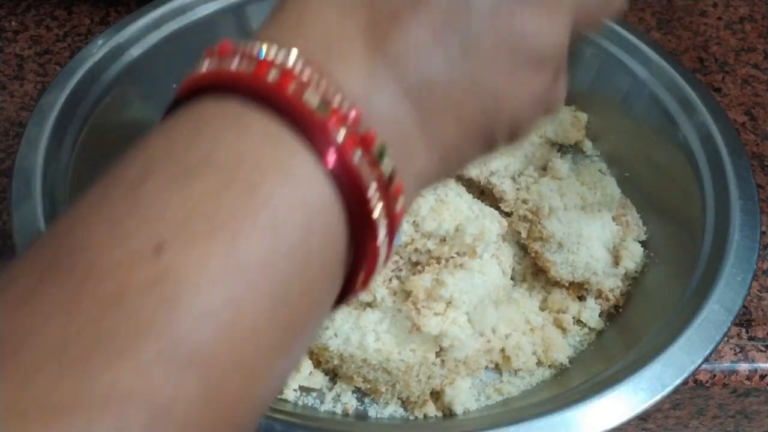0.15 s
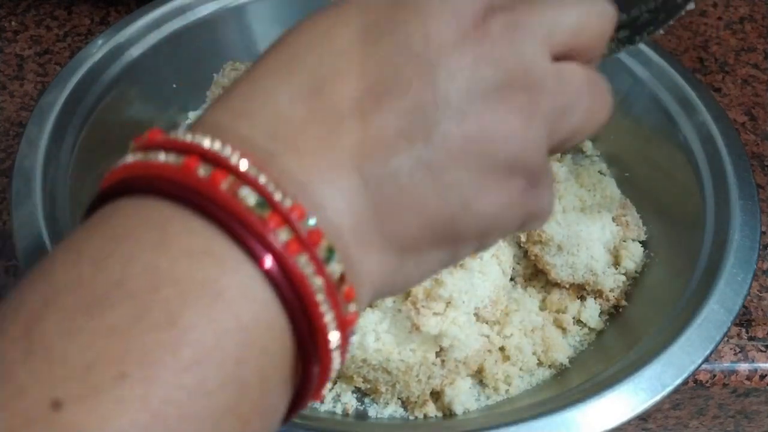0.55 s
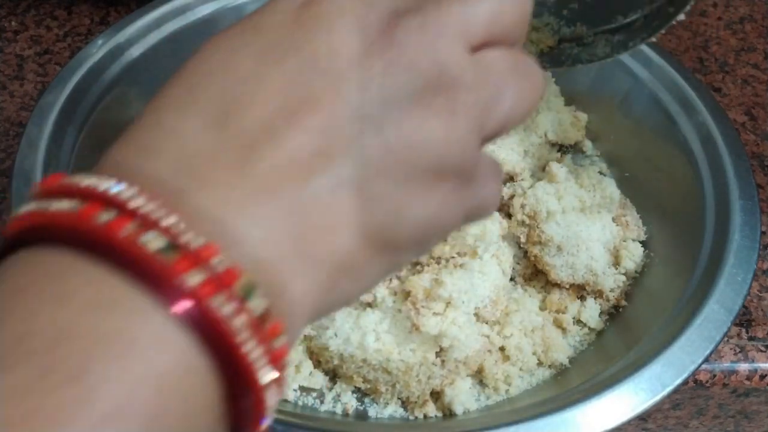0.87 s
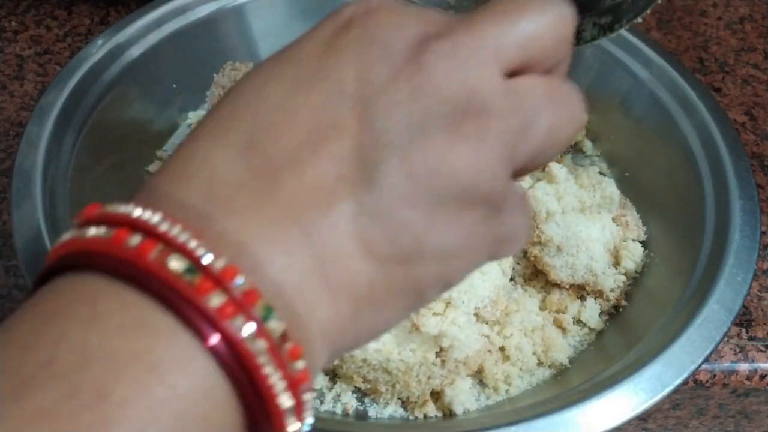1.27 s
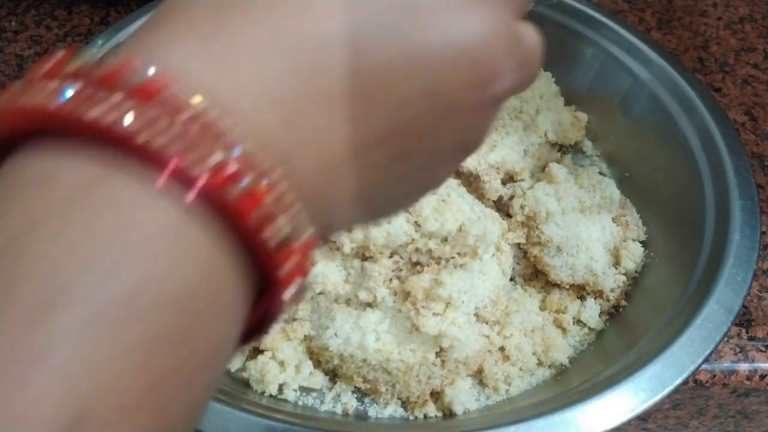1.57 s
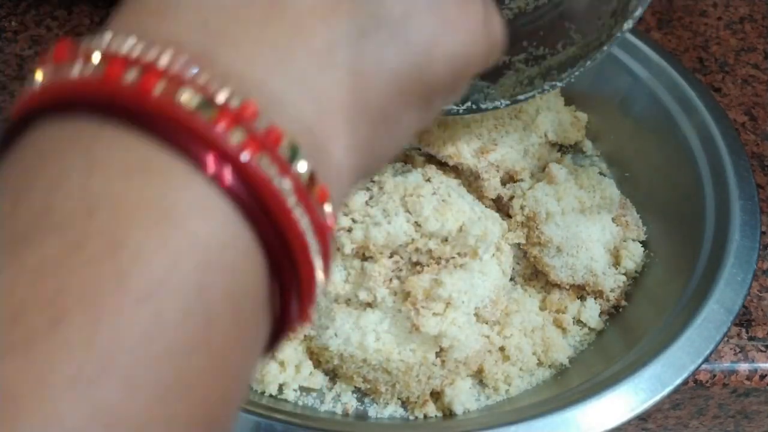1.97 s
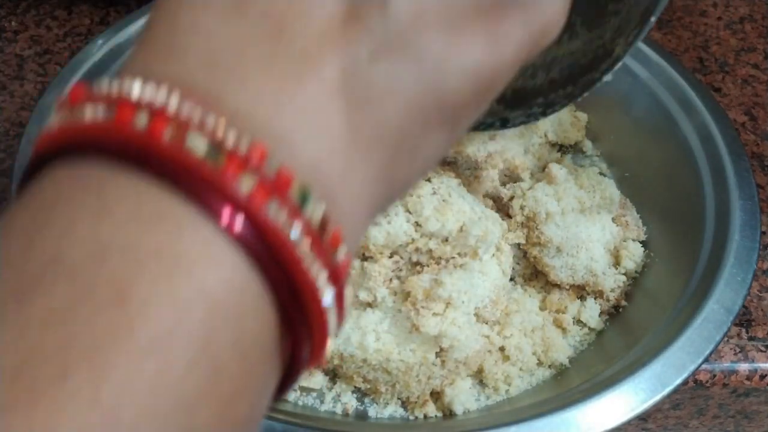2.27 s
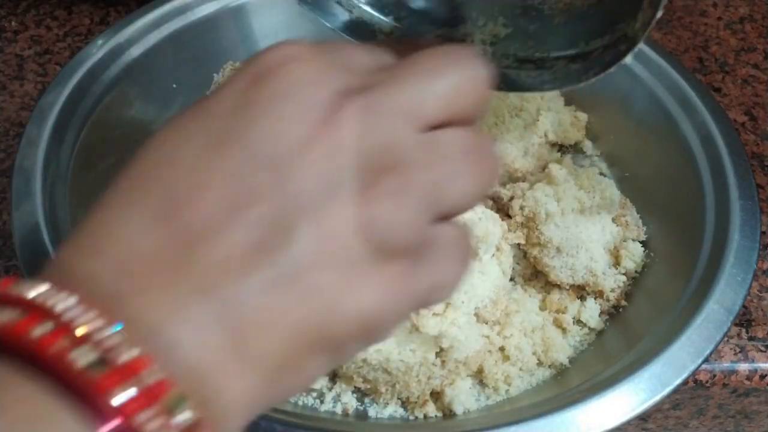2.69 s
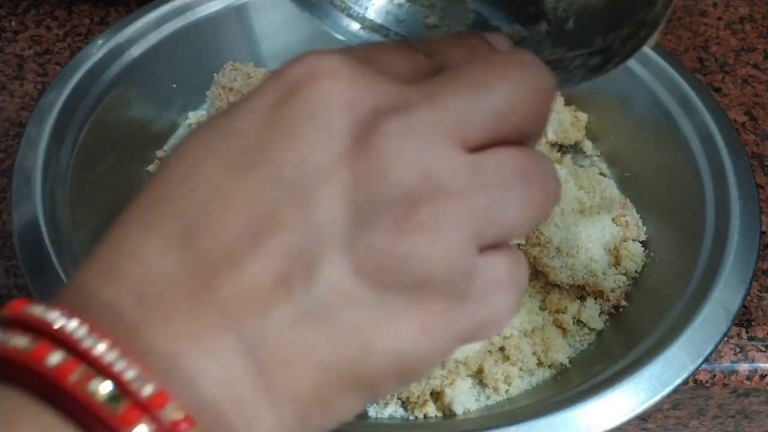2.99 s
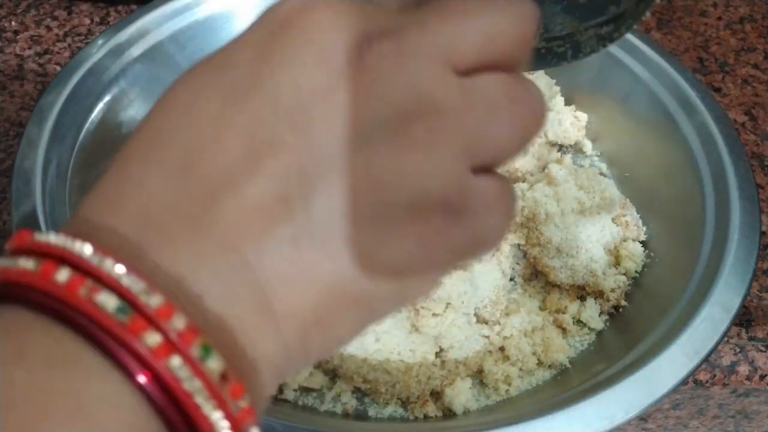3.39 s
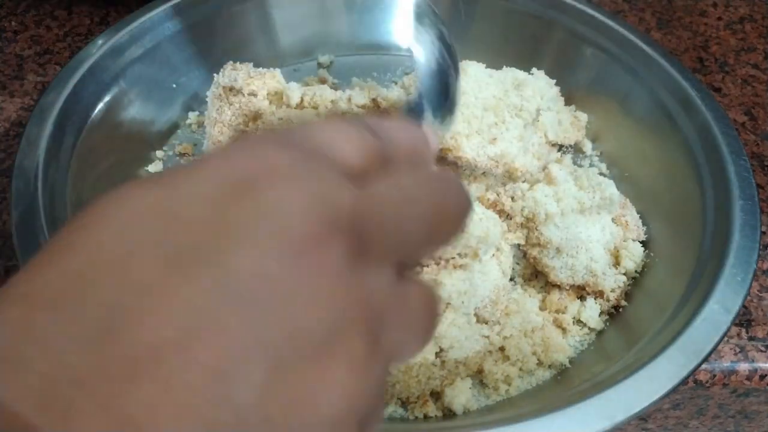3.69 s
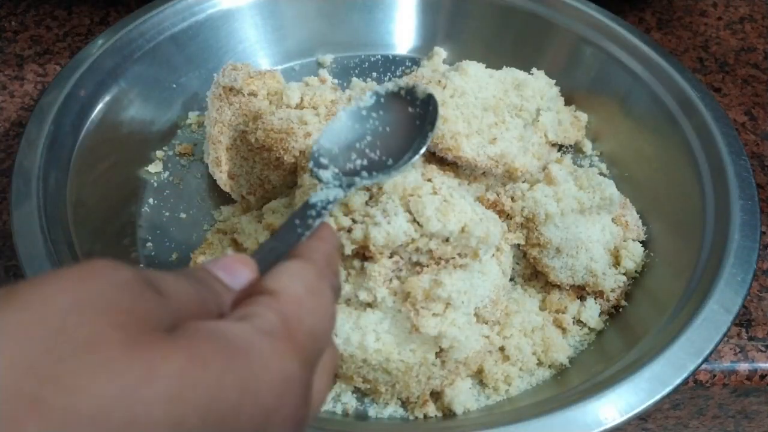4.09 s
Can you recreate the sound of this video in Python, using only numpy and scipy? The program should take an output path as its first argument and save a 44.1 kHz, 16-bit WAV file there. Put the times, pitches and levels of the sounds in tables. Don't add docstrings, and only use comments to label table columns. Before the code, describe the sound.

A metal spoon knocks and scrapes quickly inside a small hollow steel tin, then taps the rim of a full steel bowl in a kitchen.

```python
import sys
import numpy as np
from scipy import signal
from scipy.fft import rfft, irfft
from scipy.io import wavfile
from scipy.ndimage import uniform_filter1d

SR = 44100
rng = np.random.default_rng(int(sys.argv[2]) if len(sys.argv) > 2 else 0)


def int16_out(signal):
    q = np.round(np.clip(np.atleast_2d(signal).T, -1, 1) * 32767)
    wavfile.write(sys.argv[1], SR, q.astype(np.int16))


def gain_from_db(level_db):
    decades = np.asarray(level_db, float) / 20
    return 10 ** decades


N = 187072


def rms_one(x):
    return x / np.sqrt(np.mean(x ** 2) + 1e-20)


def at_hz(points, hz):
    curve_hz, values = np.transpose(points)
    return np.interp(np.log(hz), np.log(curve_hz), values)


def ring(drive, hz, t60):
    r, w = gain_from_db(-60 / (t60 * SR)), 2 * np.pi * hz / SR
    return signal.lfilter([0, np.sin(w)], [1, -2 * r * np.cos(w), r * r], drive + 1e-18)


def colour(x, spectrum):
    hz = np.maximum(np.fft.rfftfreq(4096, 1 / SR), 5)
    cepstrum = irfft(np.log(gain_from_db(np.maximum(at_hz(spectrum, hz), -70))))
    cepstrum[1:2048] *= 2
    cepstrum[2049:] = 0
    response = irfft(np.exp(rfft(cepstrum)))[None, :2048]
    return signal.fftconvolve(x, response / np.sqrt(np.sum(response ** 2)), axes=1)[:, :N]


def contacts(s, db, ms, ring_db, ring_ms, alike):
    t_ms = np.arange(5000) / SR * 1000
    chatter = np.exp(-t_ms / np.clip(ms, .3, 30)[:, None])
    hiss = gain_from_db(ring_db) * np.exp(-t_ms / ring_ms)
    onset = 1 - np.exp(-t_ms / .5)
    shape = (chatter + hiss) * onset * gain_from_db(db)[:, None]
    both, own = np.moveaxis(rng.standard_normal((len(s), 2, 5000)), 1, 0) * shape
    bursts = both + np.sqrt(1 - np.clip(alike, 0, 1)) * own * [[[1]], [[-1]]]
    return np.round(s * SR).astype(int), bursts


def placed(starts, bursts):
    out = np.zeros((2, N + 5000))
    for k, start in enumerate(starts):
        out[:, start:start + 5000] += bursts[:, k]
    return out[:, :N]


def stroke(dull, below_db):
    # start/s, end/s, pressure at start/dB, pressure at end/dB, dullness/dB
    strokes = [(0.012, 0.067, -52, -49, -9), (0.085, 0.231, -40, -44.5, -10),
               (0.231, 0.309, -43.5, -37, -11), (0.302, 0.42, -34.5, -57.5, -9.5),
               (0.593, 0.691, -50.5, -41.5, -12), (0.7, 0.757, -37, -65, -13.5),
               (0.953, 1.055, -47.5, -40.5, -15), (1.269, 1.36, -44, -40.5, -15),
               (1.62, 1.831, -38.5, -34.5, -16), (1.833, 2.055, -35, -35.5, -15.5),
               (2.239, 2.31, -44, -33.5, -14.5), (2.307, 2.38, -32.5, -46.5, -17.5),
               (2.381, 2.424, -44, -35.5, -16.5), (2.6, 2.729, -53, -42, -17), (3.04, 3.09, -54, -34, -17),
               (3.381, 3.43, -58, -37.5, -8), (3.446, 3.506, -50, -36, -18)]
    t, gain = np.arange(N) / SR, np.zeros(N)
    for start, end, first_db, last_db, dull_db in strokes:
        pressure_db = np.interp(t, [start, end], [first_db, last_db])
        touching = (t >= start) * (t < end)
        gain += gain_from_db(pressure_db + dull * dull_db + below_db) * touching
    return uniform_filter1d(gain, size=500)


def grit(per_s, spread_db, slip_db):
    sizes = gain_from_db(spread_db * np.minimum(rng.exponential(1, N), 5)) * rng.choice([-1, 1], N)
    slow_noise = uniform_filter1d(uniform_filter1d(rng.standard_normal(N), size=250), size=150)
    catches = rng.random(N) < per_s / SR
    return rms_one(sizes * gain_from_db(slip_db * rms_one(slow_noise)) * catches)


def scattered(x, t60, turns_per_s):
    t, out = np.arange(2000) / SR, 0
    for k in range(4):
        here = np.maximum(np.cos(2 * np.pi * (turns_per_s * np.arange(N) / SR + k / 4)), 0)
        modes = rng.standard_normal((2, 2000)) * gain_from_db(-60 * t / t60)
        modes = modes / np.sqrt((modes ** 2).sum(axis=1, keepdims=True))
        out = out + signal.fftconvolve((x * here)[None], modes, axes=1)[:, :N]
    return out


def background():
    # f/Hz, density/dB per Hz
    air_colour = [(12, -48), (20, -14.5), (208, -12.5), (284, -7), (662, -10), (721, -7), (784, -10.5),
                  (878, -11), (1200, -12.5), (4150, -23.5), (4770, -28.5), (11100, -24), (17000, -52)]
    # f/Hz, likeness/1
    air_likeness = [(60, 0.09), (240, 0.95), (950, 0.91), (3770, -0.55), (15000, -0.04)]
    # f/Hz, level/dB rms
    motor_lines = [(276.9, -65), (71.8, -79), (306, -95)]
    hz = np.maximum(np.fft.rfftfreq(N, 1 / SR), 5)
    mid, side = rfft(rng.standard_normal((2, N)))
    alike = np.clip(at_hz(air_likeness, hz), 0, 1)
    pair = np.sqrt(1 + alike) * mid + np.sqrt(1 - alike) * side * [[1], [-1]]
    air = gain_from_db(-58) * rms_one(irfft(pair * gain_from_db(at_hz(air_colour, hz)), N))
    motor = sum(gain_from_db(db) * rms_one(ring(rng.standard_normal(N), line_hz, 0.55)) for line_hz, db in motor_lines)
    return air + motor


def tin():
    # t/s, bright level/dB, body level/dB, body pitch where it lands/Hz
    knocks = [(0.0064, -26.5, -71, 770), (0.0817, -24.5, -32.5, 893), (0.2394, -38, -44.5, 870),
              (0.3067, -39, -50, 855), (0.3436, -59, -40.5, 990), (0.384, -38.5, -46, 890),
              (0.481, -41.5, -41.5, 730), (0.5092, -38.5, -39.5, 1390), (0.5346, -22.5, -32, 900),
              (0.6158, -36, -37, 1510), (0.7164, -34, -71, 1730), (0.9432, -25.5, -36, 1850),
              (1.0623, -22, -38.5, 1900), (1.2469, -20, -41, 1510), (1.3505, -13, -71, 2340),
              (1.5796, -17, -19.5, 773), (1.8244, -32.5, -32, 800), (2.157, -29.5, -34.5, 763),
              (2.2212, -24, -30.5, 757), (2.5485, -26, -33, 1540), (2.611, -26, -38, 1640),
              (2.7332, -13.5, -75, 1810), (3.0042, -19, -36.5, 2480), (3.097, -16, -59, 2080),
              (3.367, -30, -36, 750), (3.429, -38, -49.5, 1560), (3.518, -14, -73, 2270),
              (3.7717, -44.5, -62, 1660), (3.7844, -46, -58, 734), (3.8145, -50, -55.5, 1120),
              (0.618, -42, -38, 1600),
        (0.535, -29.5, -32.5, 1890),
        (1.5833, -24, -23, 2650),
        (1.584, -37, -32, 1010),
        (2.223, -28, -30.5, 1494),
        (2.612, -27.5, -36.5, 1890),
        (3.103, -26, -50, 3050),
    ]
    # f/Hz, density/dB per Hz
    wall_colour = [(1650, -15), (2800, -8.5), (3090, -14), (4080, -20), (4680, -11), (5540, -18),
                   (6070, -15), (6660, -11), (8710, 0.5), (10200, -1), (14000, -25.5), (16000, -27),
                   (17500, -46)]
    # f/Hz, density/dB per Hz
    body_colour = [(120, -24), (300, -12.5), (480, -3.5), (640, -14.5), (790, -6), (1000, -4), (1250, -14),
                   (1500, -5.5), (2000, -9), (2600, -11), (3300, -24.5), (4000, -27)]
    # f/Hz, density/dB per Hz
    rubbed_wall_colour = [(1880, -36), (3200, -20), (3780, -18), (6130, -20), (8280, -4), (9860, 0.5),
                          (10600, -2.5), (12200, -13), (15500, -25.5), (16600, -25), (17000, -35)]
    # f/Hz, density/dB per Hz
    rubbed_body_colour = [(290, -40.5), (500, -4), (548, -17), (662, -12.5), (768, -5.5), (899, -10.5),
                          (1220, -11), (1500, -5), (1970, -10.5), (3600, -26.5), (4680, -34), (7920, -120)]
    # f/Hz, level/dB, t60/s
    after_ring = [(2442, -49.5, 0.067), (3050, -60, 0.14), (4800, -62, 0.1), (4830, -56, 0.077),
                  (7250, -64, 0.06), (7300, -48.5, 0.062), (8140, -46, 0.046), (8400, -47.5, 0.062),
                  (8910, -53, 0.043), (9580, -53.5, 0.067), (9700, -51.5, 0.1), (10380, -52.5, 0.12),
                  (11450, -46, .06)]

    s, bright_db, body_db, body_hz = np.transpose(np.array(knocks))
    chatter_ms = 2.39 + 0.03 * (np.maximum(bright_db, body_db) + 21)
    cracks = placed(*contacts(s, bright_db - 2.5, chatter_ms, ring_db=-18.0, ring_ms=22.6, alike=0.15))
    cracks += gain_from_db(6.5) * sum(gain_from_db(db) * ring(cracks, hz, t60) for hz, db, t60 in after_ring)

    starts, thuds = contacts(s, body_db - 4.0, 2.28 * chatter_ms, ring_db=-19.5, ring_ms=14.0, alike=0.9)
    for k, hz in enumerate(body_hz):
        thuds[:, k] += gain_from_db(-22.5) * ring(thuds[:, k], hz, 0.021)

    bright_rub = stroke(dull=0, below_db=0) * grit(5000, 2.2, slip_db=1.0)
    bright_rub = scattered(bright_rub, t60=0.011, turns_per_s=3.6)
    body_rub = stroke(dull=0.95, below_db=-0.5) * grit(1200, 2.55, slip_db=5.0)
    body_rub = scattered(body_rub, t60=0.037, turns_per_s=2.1)

    knocked = colour(cracks, wall_colour) + colour(placed(starts, thuds), body_colour)
    return knocked + colour(bright_rub, rubbed_wall_colour) + colour(body_rub, rubbed_body_colour)


def hum():
    # t/s, level/dB, f/Hz, time until its two modes first cancel/ms
    hums = [(0.006, -35, 430, 60), (0.081, -30.5, 434, 60), (0.305, -26, 457, 15.3), (0.346, -35, 439, 56),
            (0.384, -39.5, 447, 64), (0.48, -39, 432, 36), (0.509, -29.5, 475, 13.5), (0.534, -19, 425, 54),
            (0.616, -43, 470, 36), (0.728, -37, 430, 70), (0.909, -39.5, 433, 40), (0.942, -26.5, 424, 55),
            (1.062, -39, 427, 71), (1.249, -42, 437, 70), (1.35, -40.5, 435, 55), (1.579, -16, 435, 34.6),
            (1.622, -28, 435, 20), (1.654, -37, 461, 77), (1.696, -37, 426, 43), (1.825, -37, 435.4, 85),
            (2.155, -29, 449, 31), (2.221, -35.5, 409, 25), (2.321, -39.5, 442, 29),
            (2.549, -20.5, 421.5, 52), (2.622, -33.5, 426, 28), (2.734, -30, 431, 60),
            (3.004, -43, 429, 87), (3.096, -38, 430, 79), (3.365, -28.5, 425, 62), (3.518, -32.5, 436, 89)]
    # f/Hz, level/dB, t60/s
    murmur_modes = [(438, 9, 0.29), (464, 32, 0.085), (506, -30.5, .1)]
    out, t = np.zeros(N + SR), np.arange(SR // 3) / SR
    swell = (1 - np.exp(-t / 0.0026)) ** 2
    for s, db, hz, null_ms in hums:
        t60 = 0.043 + 1.85 * null_ms / 1000
        neighbour = gain_from_db(-1.5) * np.sin(2 * np.pi * hz * t + np.pi * t * 1000 / null_ms)
        pair = np.sin(2 * np.pi * hz * t) + neighbour
        start = round((s + 0.0017) * SR)
        out[start:start + len(t)] += gain_from_db(db - 60 * t / max(t60, .02)) * swell * pair
    rub = grit(900, 2.8, slip_db=3.0)
    murmur = rms_one(sum(gain_from_db(db) * ring(rub, hz, t60) for hz, db, t60 in murmur_modes))
    return out[:N] + stroke(dull=1, below_db=-4) * murmur


def kitchen(x, first_ms):
    # f/Hz, t60/s
    reverb = [(150, 0.24), (500, 0.48), (2000, 0.53), (9000, 0.31), (15000, 0.28)]
    t, echo = np.arange(SR // 2) / SR, 0
    for low in 90 * 2.0 ** np.arange(8):
        band = signal.butter(2, [low, min(2 * low, .45 * SR)], "band", fs=SR, output="sos")
        decay = gain_from_db(-60 * t / at_hz(reverb, 1.39 * low)) * (t > first_ms / 1000)
        echo = echo + signal.sosfilt(band, rng.standard_normal((2, len(t)))) * decay
    echo = echo / np.sqrt((echo ** 2).sum(axis=1, keepdims=True))
    return signal.fftconvolve(x, echo, axes=1)[:, :N]


def pushes():
    # t/s, thump level/dB, air push level/dB
    jolts = [(0.305, -50.5, -71), (0.534, -45.5, -70), (0.721, -50.5, -90), (0.943, -51.5, -78),
             (1.352, -60, -63), (1.583, -44.5, -64), (1.823, -49, -69), (2.157, -53.5, -68),
             (2.226, -47.5, -67), (2.549, -48.5, -69), (2.737, -48.5, -76), (3.096, -55, -67),
             (3.37, -51, -73), (3.52, -77, -63), (4.032, -60, -67)]
    s, thump_db, air_db = np.transpose(jolts)
    starts = np.round(s * SR).astype(int)
    thumps, puffs = np.zeros((2, N))
    thumps[starts] = gain_from_db(thump_db + 7.5)
    puffs[starts] = gain_from_db(air_db + 9.5)
    return signal.lfilter([.02], [1, -.98], ring(thumps, 203.0, 0.11) + ring(puffs, 36, 0.14))


def bowl():
    # t/s, level/dB, rattle length/ms
    rim_taps = [
        (4.032, -17.5, 3.85),
        (4.047, -49, 7.8),
        (4.060, -33.5, 3.2),
        (4.085, -39.5, 5.6),
        (4.114, -25.5, 2.7),
        (4.126, -36, 5.9),
        (4.152, -40.5, 4.1),
        (4.185, -69, 6.4),
    ]
    # f/Hz, density/dB per Hz
    clatter_colour = [(260, -24.5), (520, -8), (700, -13.5), (930, 0), (1200, -3.5), (1600, -9),
                      (2400, -11.5), (2750, -27), (3500, -40), (4500, -23), (5600, -34), (6700, -21),
                      (8700, -14), (11000, -26), (15500, -62)]
    # f/Hz, level/dB, t60/s
    wall_modes = [(890, -35, 0.29), (860, -50, .2), (970, -47, 0.13), (1160, -42, 0.15), (1310, -40, .15),
                  (1300, -61, .15), (1464, -34.5, 0.14), (1594, -33, 0.18), (1680, -47, .15),
                  (1880, -53, 0.075), (2380, -35, 0.052), (6750, -26.5, 0.019), (8100, -43, .05),
                  (8700, -30, 0.037)]
    # t/s, f/Hz, level/dB
    low_note = [
        (4.035, 421, -42.5),
        (4.088, 433.5, -31.5),
        (4.122, 433, -28.5),
        (4.144, 429.6, -70),
        (4.18, 431, -39),
        (4.24, 415, -60),
    ]
    s, db, ms = np.transpose(rim_taps)
    starts, rattles = contacts(s, db + 2, ms, ring_db=-15, ring_ms=29.5, alike=0.29)
    out = colour(placed(starts, rattles), clatter_colour)

    taps = np.zeros(N)
    taps[starts] = gain_from_db(db - db[0])
    for k, (hz, level_db, t60) in enumerate(wall_modes):
        out += gain_from_db(level_db) * (-1) ** k * ring(taps, hz, t60)

    s, note_hz, note_db = np.transpose(low_note)
    t = np.arange(N) / SR
    swell = uniform_filter1d(gain_from_db(np.interp(t, s, note_db, left=-200)), size=300)
    phase = 2 * np.pi * np.cumsum(np.interp(t, s, note_hz)) / SR
    return out + np.sqrt(2) * swell * np.sin(phase)


def scene():
    no_bass = signal.butter(2, 170, "high", fs=SR, output="sos")
    ringing = signal.sosfilt(no_bass, tin() + bowl()) * gain_from_db([[-.8], [.8]])
    hollow = signal.sosfilt(no_bass, hum()) * gain_from_db([[-2.5], [2.2]])
    room = gain_from_db(-7) * kitchen(ringing, first_ms=2.7) + gain_from_db(-22.0) * kitchen(hollow, first_ms=44.0)
    return ringing + hollow + room + pushes() + background()


def band_limit(x):
    return signal.sosfilt(signal.butter(12, 17750, fs=SR, output="sos"), x)


def record(dry):
    top_cut = signal.cheby2(8, 40, 17750, fs=SR, output="sos")
    mix = signal.sosfilt(top_cut, dry)
    return band_limit(mix)


dry = scene()
out = record(dry)
int16_out(out)
```